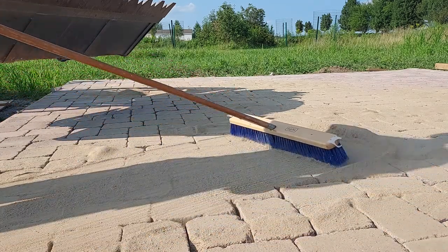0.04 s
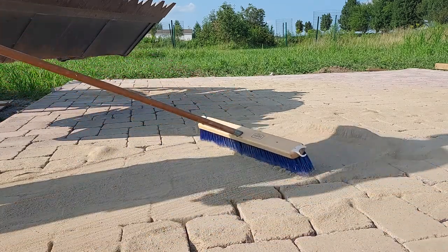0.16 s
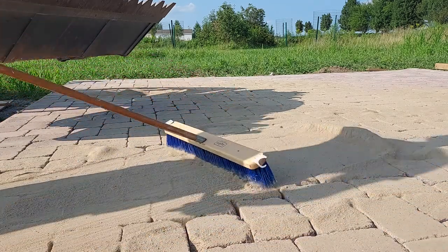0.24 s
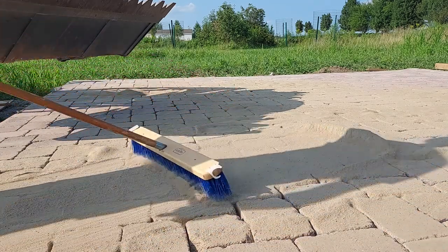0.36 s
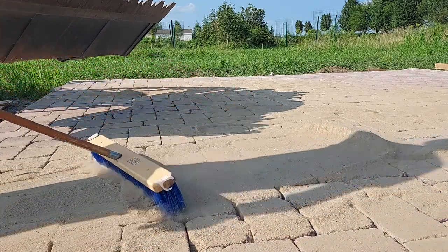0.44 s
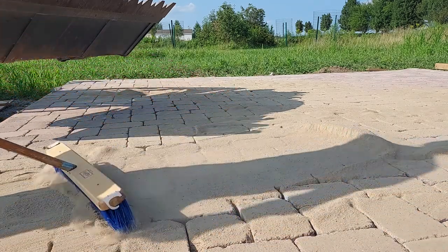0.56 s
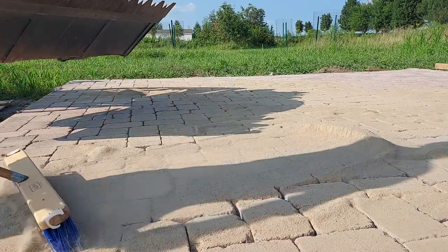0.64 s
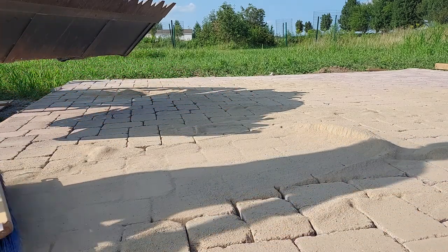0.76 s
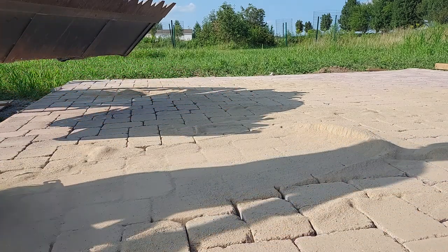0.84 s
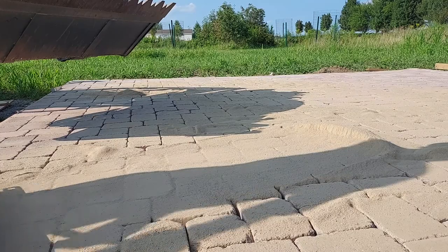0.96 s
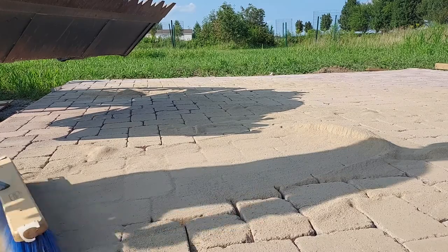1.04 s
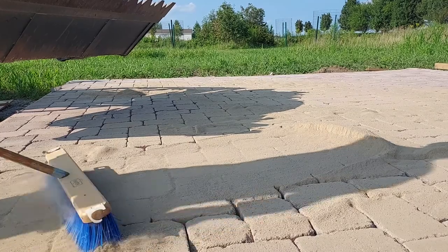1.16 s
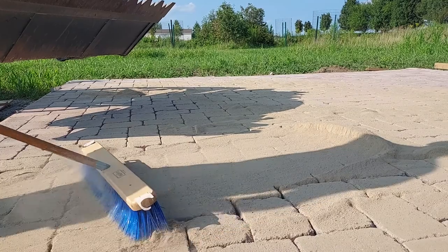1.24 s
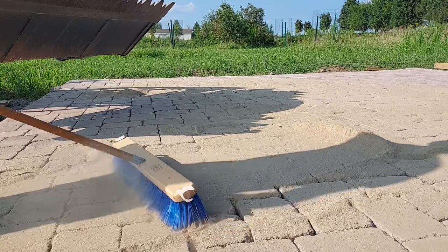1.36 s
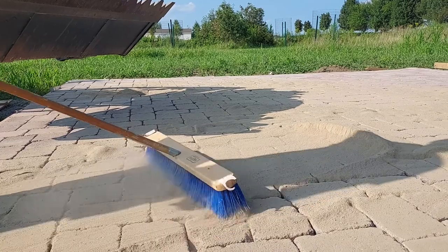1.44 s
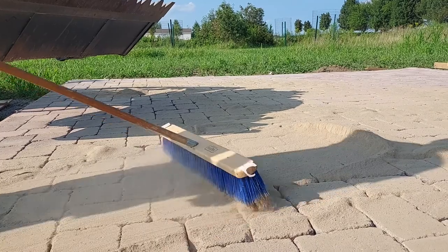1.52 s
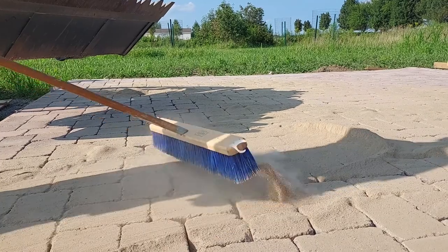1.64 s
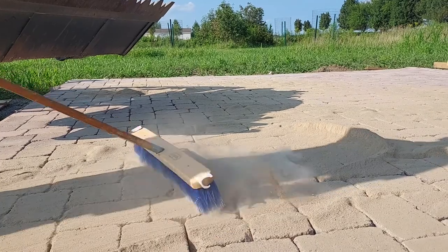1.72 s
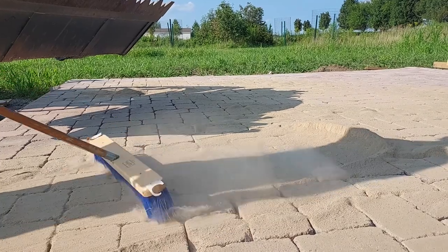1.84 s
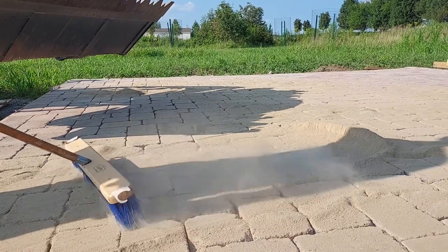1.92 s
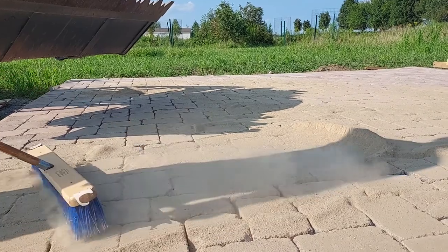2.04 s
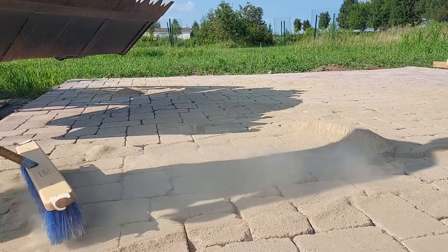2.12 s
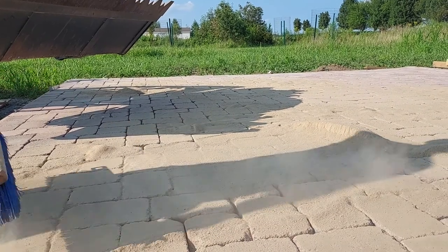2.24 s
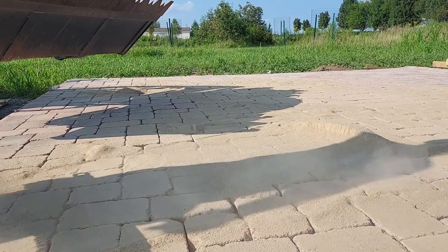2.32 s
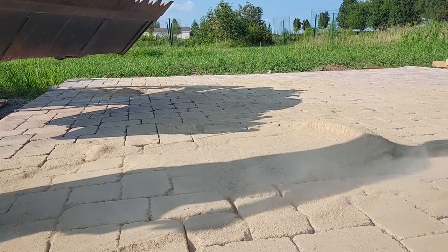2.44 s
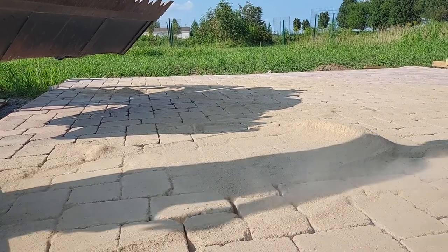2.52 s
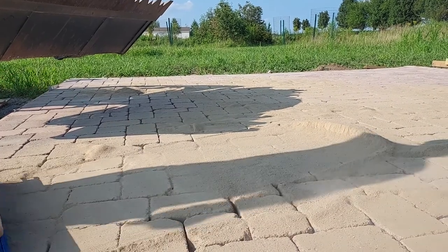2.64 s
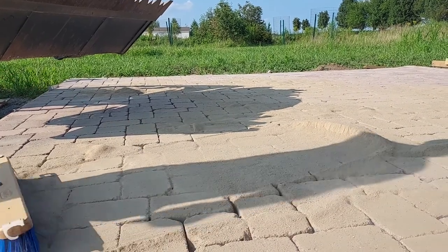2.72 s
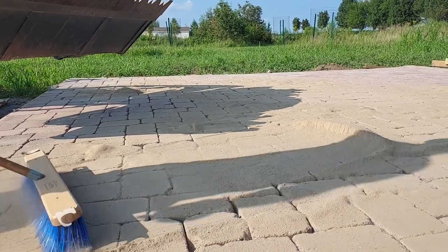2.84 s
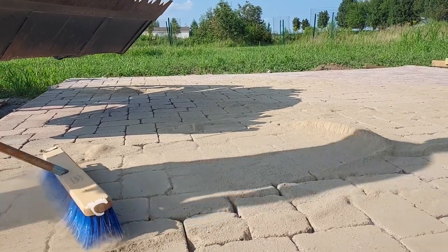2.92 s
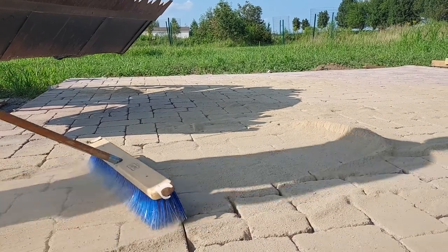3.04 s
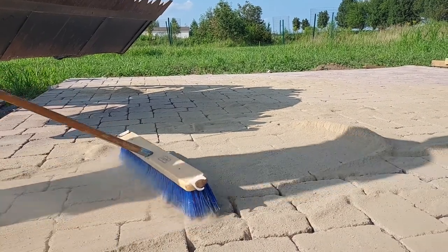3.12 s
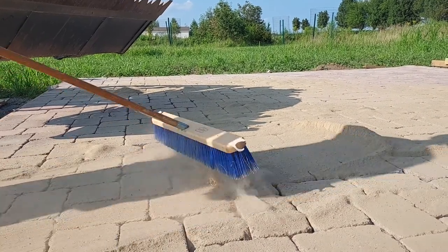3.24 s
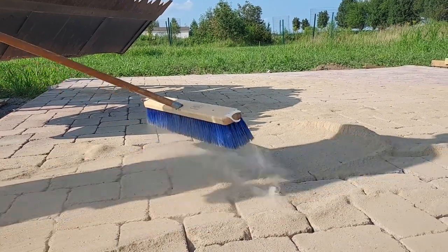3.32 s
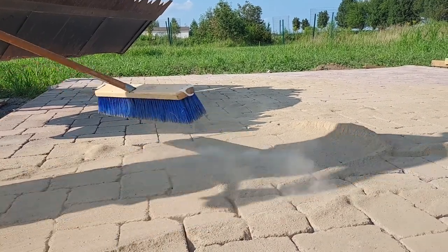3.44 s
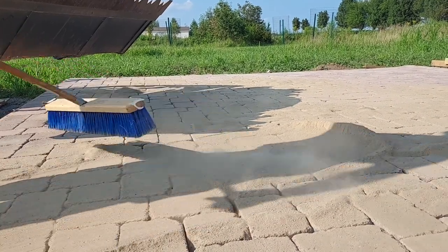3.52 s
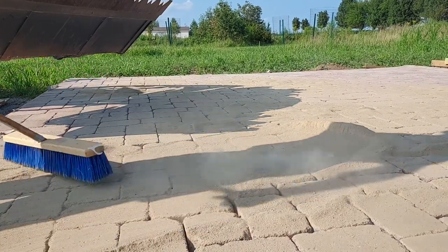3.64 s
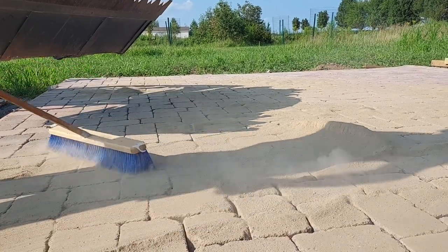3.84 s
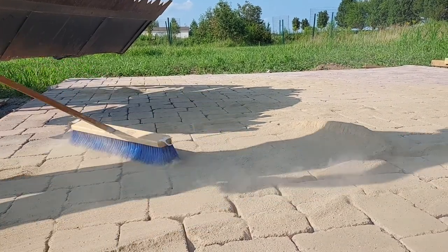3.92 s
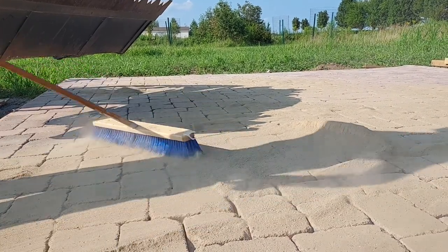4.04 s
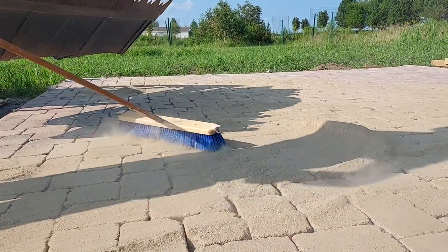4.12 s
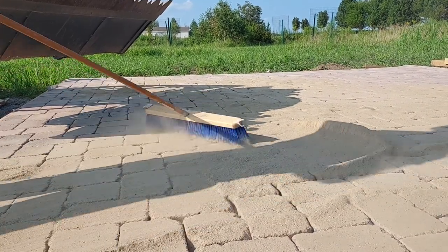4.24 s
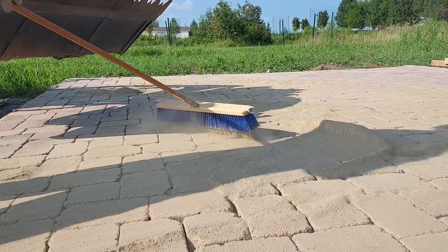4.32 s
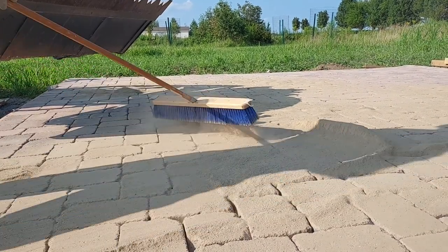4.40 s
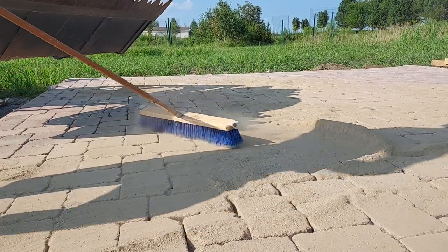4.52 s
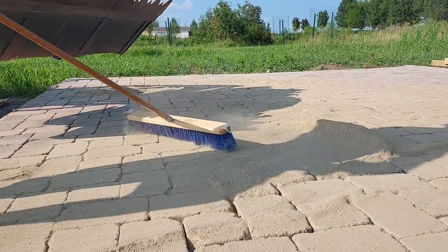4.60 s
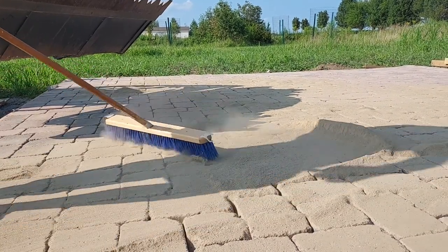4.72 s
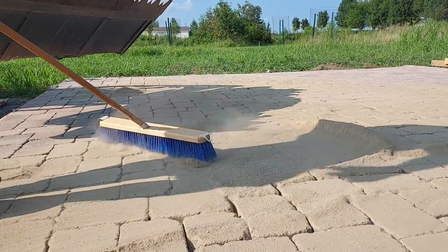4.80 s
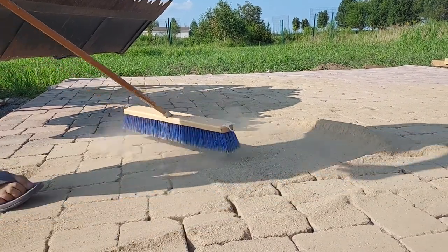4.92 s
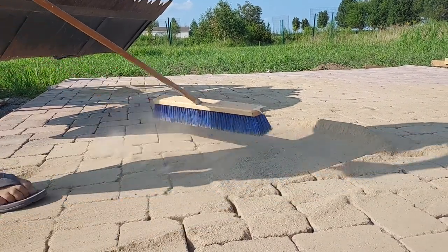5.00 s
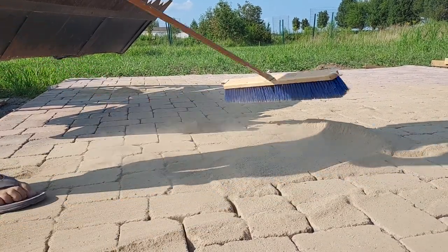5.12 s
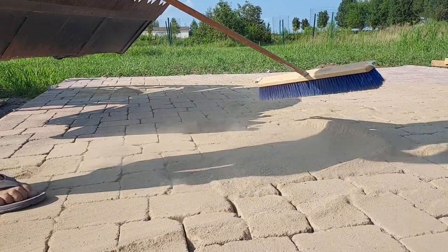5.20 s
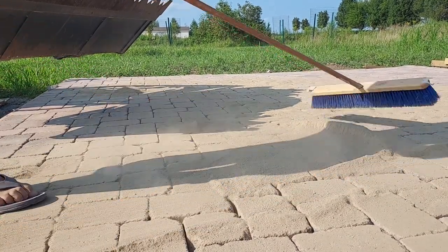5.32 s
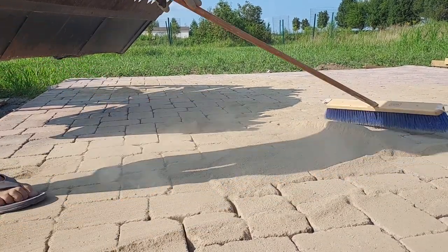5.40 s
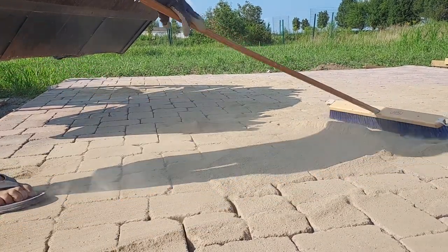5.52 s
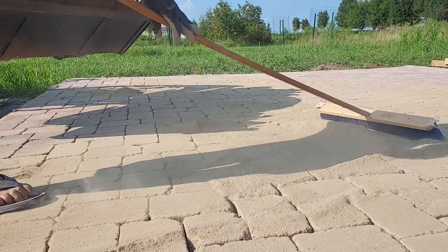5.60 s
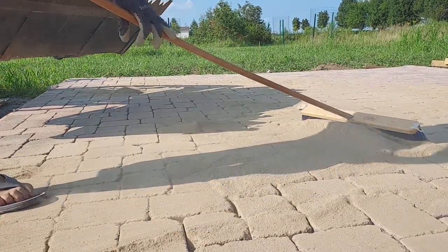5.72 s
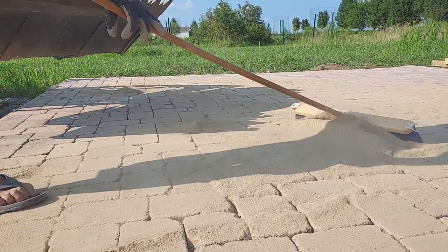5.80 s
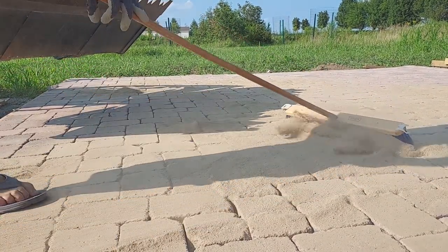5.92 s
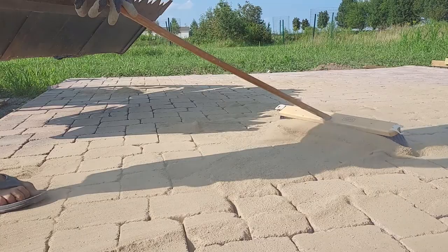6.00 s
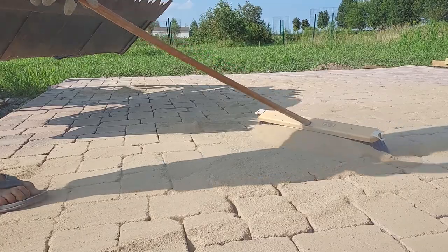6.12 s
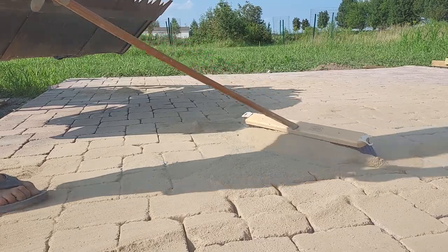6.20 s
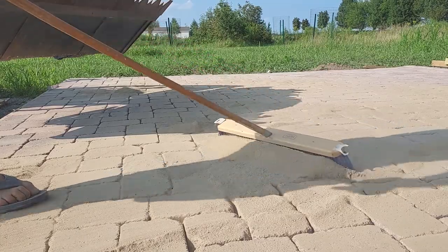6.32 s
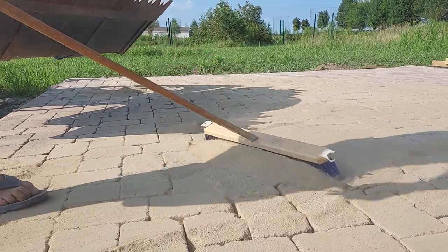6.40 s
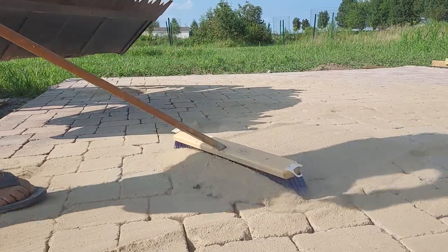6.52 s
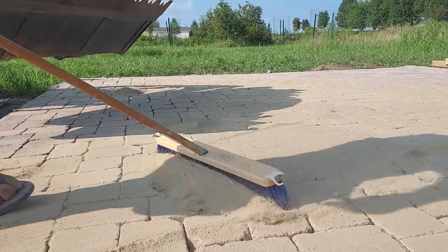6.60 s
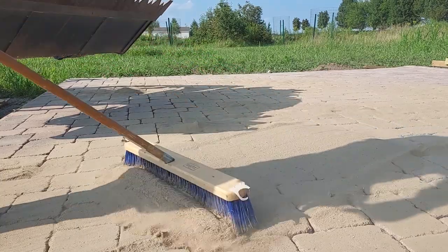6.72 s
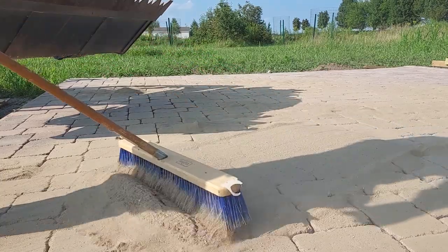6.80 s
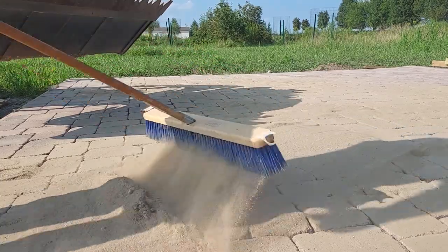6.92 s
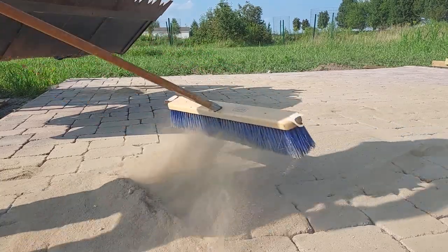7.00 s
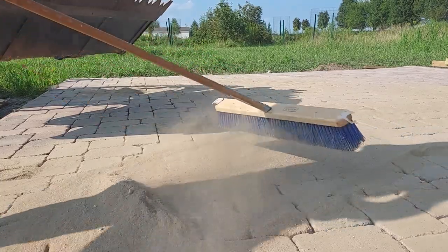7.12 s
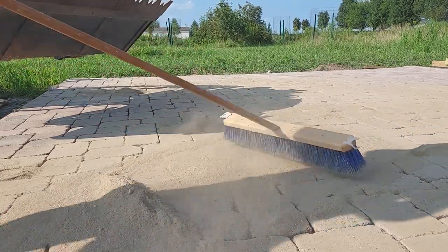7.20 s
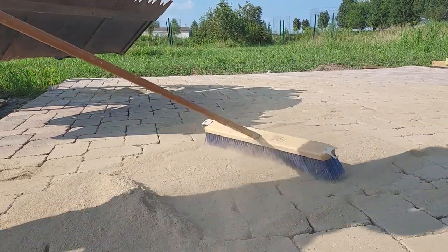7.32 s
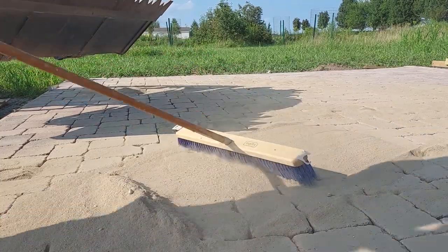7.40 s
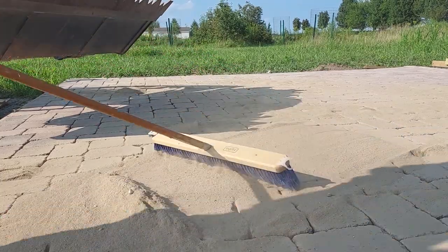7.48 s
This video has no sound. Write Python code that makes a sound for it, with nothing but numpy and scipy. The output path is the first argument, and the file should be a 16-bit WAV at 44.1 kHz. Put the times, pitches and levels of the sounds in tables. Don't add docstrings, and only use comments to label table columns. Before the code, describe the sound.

Close to the ground outdoors, a stiff push broom sweeps sand over pavers in long gritty, hissing strokes. Between strokes the wooden head lands with crunches, knocks and dull thuds, the hardest near the middle. Later, sandals scuff lightly with tiny grit ticks, then a soft, heavy drag of sand and more sweeping. Crickets chirp steadily, a motor hums faintly far off, and wind bumps the stereo phone microphone.

```python
import sys
import numpy as np
from scipy import signal
from scipy.fft import rfft, irfft, next_fast_len
from scipy.io import wavfile
from scipy.ndimage import uniform_filter1d, map_coordinates

SR = 44100
rng = np.random.default_rng(int(sys.argv[2]) if len(sys.argv) > 2 else 0)


def wav_out(sig):
    wavfile.write(sys.argv[1], SR, np.round(np.clip(np.atleast_2d(sig).T, -1, 1) * 32767).astype(np.int16))


def makeup_ratio(level_db):
    decades = np.asarray(level_db, float) / 20
    return 10 ** decades


N = 332955
TIME, SIZE = np.arange(N) / SR, next_fast_len(N + 4096)
FREQ = np.arange(SIZE // 2 + 1) * SR / SIZE
COARSE = TIME[::64]

# (t/s, knock level/dB, thud level/dB, edge level/dB)
BLOWS = [(0.964, -31, -41.5, -42.5), (1.692, -45, -41, -45), (1.716, -31.5, -27, -41.5),
         (2.455, -44, -29, -41.5), (2.465, -37.5, -31.5, -44), (3.667, -18, -20.5, -26.5),
         (4.304, -55, -76, -52), (4.508, -27, -28.5, -34.5), (4.891, -51, -52, -59),
         (5.426, -35.5, -32.5, -34.5), (5.47, -48, -60, -51), (7.256, -41, -32, -49),
         (7.269, -42, -52, -36), (7.473, -60, -53, -46.5), (7.503, -42, -61, -44)]
# (f/Hz, density/dB per Hz)
HISS = [(3530, -22.5), (6000, -6), (8030, -3), (8650, -5), (10800, -2), (12500, 3), (15200, -0.5),
        (16000, -26)]


def shape(table):
    hz, db = np.transpose(table)
    return makeup_ratio(np.interp(np.log(FREQ + 1), np.log(hz), db))


def unit(x):
    return x / np.sqrt(np.mean(x ** 2))


def colour(x, gain):
    return irfft(rfft(x, SIZE) * gain, SIZE)[..., :N]


def resonance(hz, width_hz):
    return 1 / (1 + 1j * (FREQ - hz ** 2 / (FREQ + 1)) / width_hz)


def walk(rate_hz):
    k = int(SR / rate_hz)
    held = np.repeat(rng.standard_normal(N // k + 1), k)
    return 1.195 * uniform_filter1d(uniform_filter1d(held, k), k)[:N]


def grains(spread_db, flicker_db, rate_hz):
    size = np.minimum(rng.exponential(size=N), 4.5)
    return rng.standard_normal(N) * makeup_ratio(spread_db * size + flicker_db * walk(rate_hz))


def ring(hz, t60_s, span_s=.25):
    t = np.arange(int(span_s * SR)) / SR
    return np.sin(2 * np.pi * hz * t) * np.exp(-np.log(1000) * t / t60_s)


def add(out, x, s):
    i = max(int(s * SR), 0)
    out[..., i:i + x.shape[-1]] += x[..., :N - i]


def ports(x, lag):
    return np.array([x, map_coordinates(x, [np.arange(N) - lag], order=3, mode="nearest")])


def per_sample(gains):
    return np.array([np.interp(TIME, COARSE, g) for g in gains])


def swells(s, half_s, db):
    offset = (COARSE - s[:, None]) / half_s[:, None]
    return np.sqrt(np.sum(makeup_ratio(db[:, None] - 10.8 * offset ** 2) ** 2, axis=0))


def head_gain(plain_db):
    # (f/Hz, width/Hz, level/dB)
    modes = [(1040, 370, -10), (1316, 250, -6), (1640, 114, 4), (2210, 330, 0), (2910, 370, -6.5)]
    return makeup_ratio(plain_db) + sum(makeup_ratio(db) * resonance(hz, width_hz) for hz, width_hz, db in modes)


def pressure():
    # (start/s, lift/s, early pressure/dB, late pressure/dB, sand ahead/dB)
    strokes = [(-.1, 0.482, -42.5, -42.5, -21), (0.356, 0.757, -41.5, -41, -11.5),
               (0.967, 1.521, -35, -33, -22.5), (1.694, 2.105, -39, -40.5, -24.5),
               (2.486, 2.794, -37, -37.5, -19), (2.709, 3.178, -35.5, -33, -21.5),
               (3.697, 4.282, -33.5, -33.5, -28), (4.548, 4.843, -35, -40.5, -27),
               (5.511, 5.804, -45, -57, -14.5), (6.168, 6.77, -59, -61.5, -1.5),
               (7.287, 7.7, -40.5, -41.5, -16.5)]
    # (offset/dB, gain/dB per dB of sand, rise as the heap builds/dB)
    layers = [(0.5, 0.0836, 1.5), (5, 0.47, 1.5), (2, 0.53, 1), (3, 1.05, 3)]
    flick_db = [
        [1.5],
        [1.5],
        [-1],
        [-4.5],
    ]
    settle_db = [-52, -18, -17, -16.5]
    attack_s, release_s, flick_s, settle_t60_s = 0.089, 0.076, .06, 0.15
    offset_db, per_sand, build_db = np.transpose(layers)[:, :, None]
    power = np.zeros((len(layers), len(COARSE)))
    for start, lift, early_db, late_db, sand_db in strokes:
        drag = makeup_ratio(13 * np.exp(min(sand_db, 0) / 4))
        attack = np.clip((COARSE - start) / (attack_s * drag), 0, 1)
        release = np.clip((lift - COARSE) / (release_s * drag ** 0.86), 0, 1)
        flick = np.exp(-((lift - release_s - COARSE) / flick_s - 0.44) ** 2)
        lean = attack * release * makeup_ratio(np.array(flick_db) * np.tanh(late_db - early_db) * flick)
        along = np.clip((COARSE - start) / (lift - start), 0, 1)
        level_db = early_db + (late_db - early_db + build_db) * along + offset_db + per_sand * sand_db
        power += (lean * makeup_ratio(level_db)) ** 2
    for s, _, thud_db, _ in BLOWS:
        fade = (COARSE > s) * np.exp(-np.log(1000) * np.abs(COARSE - s) / settle_t60_s)
        power += (makeup_ratio(thud_db + np.array(settle_db)[:, None]) * fade) ** 2
    return per_sample(np.sqrt(power))


def sweeping(lag):
    # (f/Hz, density/dB per Hz)
    grit_spectrum = [(1200, -15.5), (2300, 3.5), (3800, 0), (5000, 2.5), (6500, -6), (8500, -14),
                     (11000, -53)]
    # (f/Hz, density/dB per Hz)
    rasp_spectrum = [(250, -39), (500, -24), (800, -4.5), (1050, -0.5), (2000, -4.5), (3000, -21)]
    # (f/Hz, density/dB per Hz)
    heap_spectrum = [(150, -15), (350, -20), (550, 1.5), (750, 4), (1200, -14.5)]
    out, gains = 0, pressure()
    for offset, db in [(-2.8, -8.2), (0, -1.3), (2.8, -8.2)]:  # (lag/samples, level/dB)
        hiss = unit(colour(grains(2.1, 1.0, 27), shape(HISS)))
        grit = unit(colour(grains(3.8, 0.24, 12), shape(grit_spectrum)))
        rasp = unit(colour(grains(3.17, 1.3, 8.1), shape(rasp_spectrum) * head_gain(-12)))
        heap = unit(colour(grains(4.9, 0.73, 18), shape(heap_spectrum)))
        point = sum(gain * layer for gain, layer in zip(gains, (hiss, grit, rasp, heap)))
        out = out + makeup_ratio(db) * ports(point, lag + offset)
    return out


def field():
    # (f/Hz, density/dB per Hz)
    hush_spectrum = [(100, -8), (160, -12), (250, -11), (600, -23), (1400, -30.5), (2300, -20),
                     (4000, -35.5), (6100, -55.5), (8800, -23), (10200, -35), (11800, -23.5),
                     (14000, -16.5), (16000, -15)]
    # (t/s, f/Hz, level/dB)
    motor = [(0, 156, -67), (2.2, 156, -67), (2.9, 142, -67), (3.2, 152, -67), (4.4, 155, -67),
             (5.4, 156, -69), (7.55, 156, -69)]
    air = np.array([grains(1.0, 0.4, 2.93), grains(0.21, 2.5, 2.2)])
    hush = makeup_ratio(-58.5) * unit(colour(air, shape(hush_spectrum)))
    s, hz, db = np.transpose(motor)
    phase = 2 * np.pi * np.cumsum(np.interp(TIME, s, hz) + 1.97 * walk(9.9)) / SR
    return hush + makeup_ratio(np.interp(TIME, s, db) + 2.5 * walk(9)) * np.sin(phase)


def wind():
    # (t/s, half length/s,
    # level/dB, sheltered left re right/dB)
    low_swells = [(0, 0.18, -36, -1.5), (0.267, 0.13, -35.5, -5.5), (0.737, 0.17, -41, -20),
                  (1.04, 0.11, -41.5, -3), (1.285, 0.081, -32, -33), (1.442, .07, -32.5, -38),
                  (1.758, 0.13, -38, -13), (2.478, 0.13, -31.5, -30), (3.09, 0.19, -43.5, -13),
                  (3.462, 0.066, -40.5, -28), (3.85, 0.23, -37, -15), (4.58, 0.096, -44.5, -3.5),
                  (5.06, 0.17, -45, -16), (5.65, 0.16, -41.5, -28), (5.974, 0.16, -35.5, -16),
                  (6.242, 0.14, -45.5, -5.5), (6.778, 0.037, -38, -34), (7.11, 0.093, -45.5, -27)]
    # (f/Hz, density/dB per Hz)
    rumble_spectrum = [(15, -50), (30, -18.5), (55, 2.5), (80, -3.5), (110, -8.5), (200, -37.5), (400, -49)]
    # (f/Hz, density/dB per Hz)
    buffet_spectrum = [(40, -30), (110, 1), (170, -6.5), (300, -21.5), (600, -49)]
    calm_rumble_db = [
        [-60],
        [-53.5],
    ]
    calm_buffet_db = [
        [-64.5],
        [-57.5],
    ]
    s, half_s, db, lee_db = np.transpose(low_swells)

    def both_ports(right_db):
        return np.array([swells(s, half_s, right_db + lee_db), swells(s, half_s, right_db)])

    rumble_gain = per_sample(np.hypot(both_ports(db), makeup_ratio(calm_rumble_db)))
    buffet_gain = per_sample(np.hypot(both_ports(db - 5.5 + lee_db), makeup_ratio(calm_buffet_db)))
    eddies = 0.55 * rng.standard_normal(N) + rng.standard_normal((2, N))
    rumble = unit(colour(eddies, shape(rumble_spectrum)))
    buffet = unit(colour(np.array([grains(0, 3.0, 25), grains(0, 5.0, 25)]), shape(buffet_spectrum)))
    return makeup_ratio(-2.5) * (rumble_gain * rumble + buffet_gain * buffet)


def cricket(chirps, db, hz, fall, pulse_s, gap_s, lag):
    out, t = np.zeros(N), np.linspace(0, 1, int(pulse_s * SR))
    envelope = np.sin(np.pi * t ** 0.56) ** 0.67
    pulse = envelope * np.sin(2 * np.pi * hz * pulse_s * (t - fall * t ** 3 / 3))
    for s in chirps:
        for back, weaker_db in enumerate([0.0, -1.2, -4.0]):
            add(out, makeup_ratio(db + weaker_db) * pulse, s - back * gap_s - .4 * pulse_s)
    return ports(out, lag)


def insects():
    high_chirps = [.13, 1.565, 2.21, 3.345, 4.478, 4.815, 5.145, 5.495, 6.11, 6.38, 6.795, 7.264]
    low_chirps = [.14, 0.401, .645, .89, 1.135, 1.38, 1.623, 1.862, 2.096, 2.339, 2.581, 2.82, 3.05, 3.274,
                  3.517, 3.76, 4.0, 4.241, 4.456, 4.74, 4.995, 5.228, 5.489, 5.743, 5.982, 6.228, 6.474,
                  6.731, 6.995]
    # (f/Hz, width/Hz, level/dB)
    chorus = [(4877, 990, -62.5), (7780, 1400, -57.5)]
    high = cricket(high_chirps, -48, 5070, 0.095, 0.02, .042, 19.3)
    low = cricket(low_chirps, -49.5, 4770, 0.045, 0.015, 0.034, 1.94) * makeup_ratio([[-1.5], [1.5]])
    far = 0
    for hz, width_hz, db in chorus:
        buzz = np.array([grains(0.69, 0.95, 60), grains(4.8, 1.7, 60)])
        far = far + makeup_ratio(db) * unit(colour(buzz, resonance(hz, 1.4 * width_hz) ** 6))
    return high + low + far


def pops():
    # (t/s, level/dB, f/Hz, length/s)
    eddies = [(0.321, -25.5, 110, 0.025), (1.435, -41, 74.4, 0.041), (2.399, -33, 80, 0.048),
              (5.888, -32, 96, 0.058), (5.942, -23.5, 120.5, 0.05), (6.013, -31, 102, 0.023),
              (7.139, -34.5, 90, 0.0337)]
    out = np.zeros(N)
    rough = unit(colour(rng.standard_normal(N), shape([(80, -10), (200, 5.0), (350, -0.5), (700, -78.0)])))
    for s, db, hz, length_s in eddies:
        t = np.arange(int(length_s * SR)) / SR
        body = np.sin(2 * np.pi * hz * t) + 0.045 * rough[int(s * SR):][:len(t)]
        add(out, makeup_ratio(db) * np.hanning(len(t)) * body, s - length_s / 2)
    return out * makeup_ratio([[-22], [0]])


def blows(lag):
    # (t/s, crush level/dB, crush f/Hz, spray level/dB, t60/s)
    touches = [(0.9663, -32.5, 2030, -40, 0.12), (1.6897, -28.5, 1090, -38.5, 0.073),
               (1.707, -26, 2010, -39, 0.073), (1.7132, -25.5, 1710, -35, 0.045),
               (2.4509, -21, 2040, -53, 0.039), (2.458, -35, 2270, -41, 0.075),
               (3.6567, -29, 1680, -44, 0.075), (3.6658, -21, 1040, -27, 0.027),
               (4.3017, -58, 2630, -69, 0.12), (4.4926, -29, 1630, -34.5, 0.05),
               (4.505, -32, 1650, -33, 0.08), (4.891, -61, 1760, -58, 0.39),
               (5.4044, -37.5, 1620, -37.5, 0.058), (5.4223, -21, 3220, -26, 0.027),
               (5.4664, -43, 1650, -51, 0.1), (7.2539, -26, 1790, -33.5, 0.037),
               (7.2682, -39, 1110, -45, 0.1), (7.509, -50, 990, -43, 0.042)]
    # (f/Hz, level/dB, t60/s)
    knock_modes = [(269, 0, 0.051), (368, -3.5, 0.026)]
    # (f/Hz, level/dB, t60/s)
    edge_modes = [(553, -2, 0.027), (673, 5, 0.016), (1060, -7, 0.016)]
    out = np.zeros(N)
    wood_gain = head_gain(-10) * shape([(300, -20), (900, 0), (3500, 0), (7000, -12)])
    wood = unit(colour(grains(2.5, 0, 50), wood_gain))
    spray = unit(colour(grains(2.5, 0, 50), shape([(3000, -22), (6000, -8), (12000, 0), (16000, -3)])))
    t = np.arange(int(.15 * SR)) / SR
    for s, crush_db, hz, spray_db, t60_s in touches:
        i = int(s * SR)
        fade = np.minimum(t / 0.0043, 1) * np.exp(-np.log(1000) * t / max(t60_s, .005))
        fade = fade[:N - i]
        here = slice(i, i + len(fade))
        sing = unit(signal.lfilter(*signal.iirpeak(hz, 8.0, SR), rng.standard_normal(len(t))))[:N - i]
        crush = makeup_ratio(-3) * (wood[here] + sing)
        add(out, fade * (makeup_ratio(crush_db - 1.5) * crush + makeup_ratio(spray_db + 1.0) * spray[here]), s)
    rattle = unit(colour(grains(0.42, 0, 50), shape([(150, -7.0), (300, -1.5), (900, -14.5), (1500, -32.0)])))
    knock = sum(makeup_ratio(db) * ring(hz, t60_s) for hz, db, t60_s in knock_modes)
    edge = sum(makeup_ratio(db) * ring(hz, t60_s) for hz, db, t60_s in edge_modes)
    thud = ring(134.4, 0.13)
    for s, knock_db, thud_db, edge_db in BLOWS:
        i = int(s * SR)
        add(out, -makeup_ratio(edge_db + 1.5) * edge, s + 0.001)
        add(out, makeup_ratio(edge_db + 0.5) * rattle[i:][:len(t)] * np.exp(-t / 0.013)[:N - i], s + 0.00092)
        add(out, makeup_ratio(knock_db - 1.0) * knock, s + 0.0023)
        add(out, makeup_ratio(thud_db + 2.5) * thud, s + 0.0013)
    return ports(out, lag)


def scuffs():
    # (t/s, half length/s, sole level/dB, sand level/dB)
    drags = [(4.976, .06, -60.5, -70), (5.123, 0.034, -50.5, -63), (5.32, 0.29, -65.5, -56.5),
             (5.826, 0.068, -68, -72), (5.996, 0.058, -54, -51.5), (5.906, 0.017, -60, -62),
             (6.064, 0.028, -55.5, -62), (6.205, 0.097, -63, -75)]
    # (t/s, level/dB, f/Hz)
    grit_ticks = [(4.9804, -38.5, 4800), (5.771, -45, 5160), (5.8944, -54, 2400), (5.9093, -41.5, 4630),
                  (6.012, -36, 4960), (6.064, -40, 3260), (6.1853, -50, 4740), (5.984, -47, 3300),
                  (5.996, -46, 3600)]
    # (f/Hz, density/dB per Hz)
    sole_spectrum = [(400, -14), (1400, -9.5), (2300, 7.5), (3000, 2.5), (4200, 2.5), (5800, -5),
                     (8000, -10.5)]
    out, ticks = 0, np.zeros(N)
    s, half_s, sole_db, sand_db = np.transpose(drags)
    sole_gain, sand_gain = per_sample([swells(s, half_s, sole_db - 1.5), swells(s, half_s, sand_db - 8.0)])
    for lag in (9.0, 11.0, 14.0):
        sole = unit(colour(grains(3.1, 2.5, 26), shape(sole_spectrum)))
        sand = unit(colour(grains(3.0, 2.4, 30), shape(HISS)))
        out = out + ports(sole * sole_gain + sand * sand_gain, lag)
    for s, db, hz in grit_ticks:
        overtones = ring(.6 * hz, .003, .02) + ring(2.3 * hz, .0015, .02)
        add(ticks, makeup_ratio(db + 4) * (ring(hz, .004, .02) + .6 * overtones), s)
    return out + ports(ticks, 14.5)


def scene():
    # (t/s, right port lag/samples)
    place = [(0, -2), (.72, 12), (.97, 14), (1.28, 7.8), (1.5, 5.5), (1.7, 5.8), (2.08, 12), (2.46, 14.2),
             (3.15, 7.2), (3.67, 10), (4.0, 7.4), (4.27, 4), (4.6, 3), (4.85, 6), (5.4, -2), (5.55, -6.5),
             (6.3, 0), (7.55, 1)]
    # (f/Hz, left re right/dB)
    port_balance = [(100, -5.5), (250, -2.5), (450, 4), (800, 2), (1300, 4.5), (1700, -4.5), (2400, 2),
                    (4400, 2), (6000, 2), (9000, 6), (10500, 7), (12500, -2.5), (15500, -4.5)]
    lag = np.interp(TIME, *np.transpose(place))
    left, right = rfft(sweeping(lag) + field() + insects() + blows(lag) + scuffs(), SIZE)
    right = right * np.exp(-1j * 0.55 / (1 + (FREQ / 700) ** 2))
    merged = np.clip((FREQ - 8900) / 1600, 0, .92)
    right = np.sqrt(1 - merged) * right + np.sqrt(merged) * left
    tilt = np.sqrt(shape(port_balance))
    return irfft(np.array([left * tilt, right / tilt]), SIZE)[:, :N] + wind() + pops()


def top_cut(x):
    return signal.sosfilt(signal.butter(12, 16840, fs=SR, output="sos"), x)


def record(dry):
    top = shape([(15850, 0), (15930, -38), (16850, -50)])
    return top_cut(colour(dry, top))


dry = scene()
out = record(dry)
wav_out(out)
```